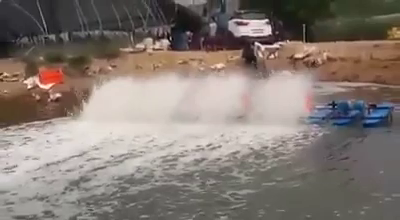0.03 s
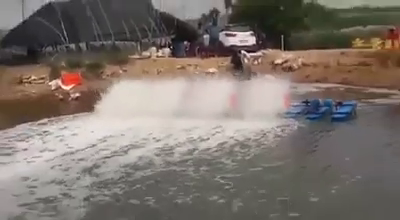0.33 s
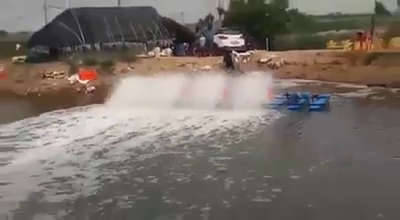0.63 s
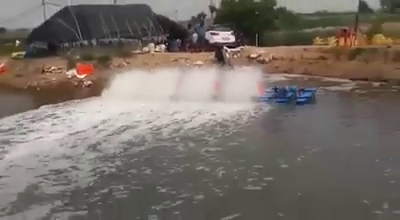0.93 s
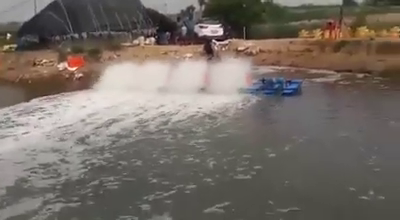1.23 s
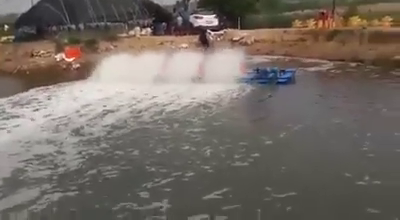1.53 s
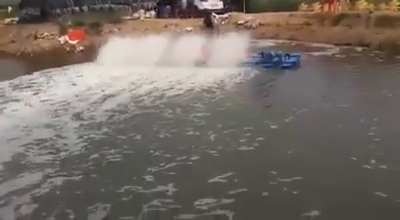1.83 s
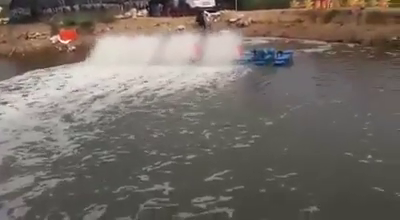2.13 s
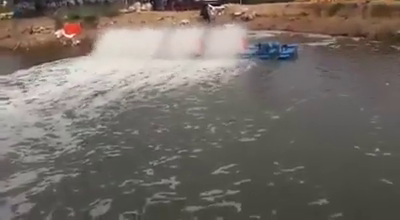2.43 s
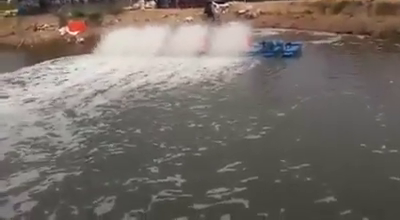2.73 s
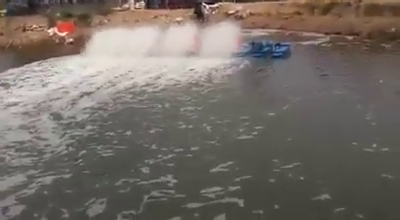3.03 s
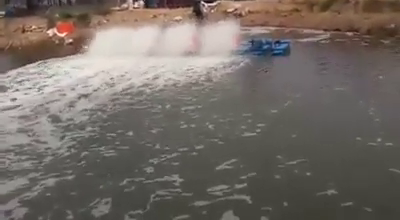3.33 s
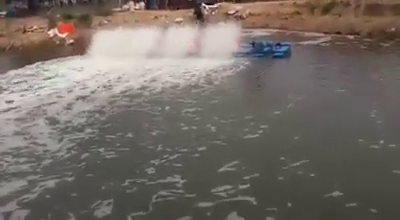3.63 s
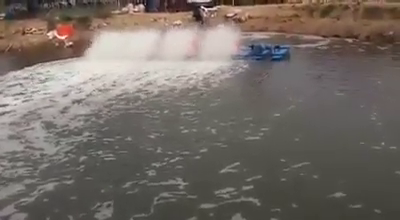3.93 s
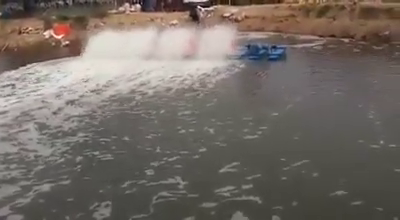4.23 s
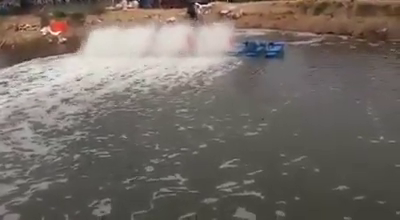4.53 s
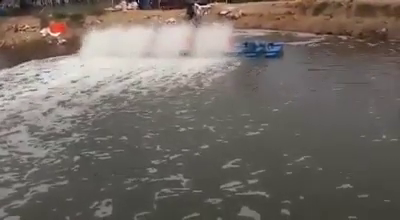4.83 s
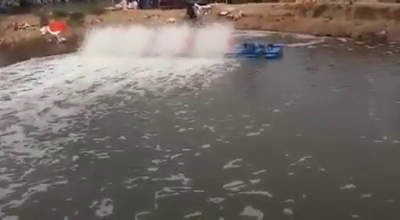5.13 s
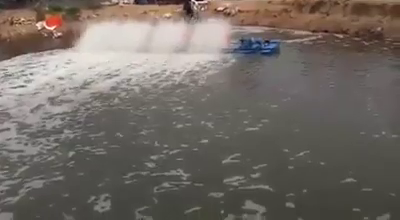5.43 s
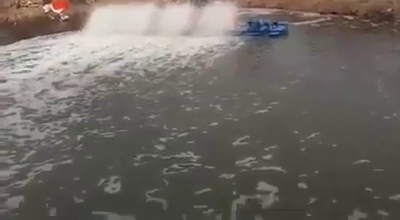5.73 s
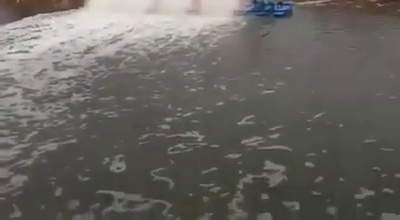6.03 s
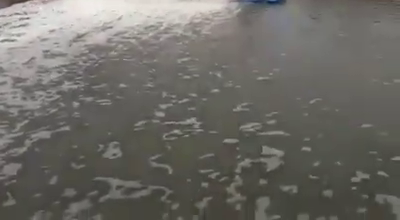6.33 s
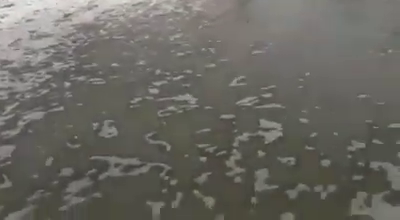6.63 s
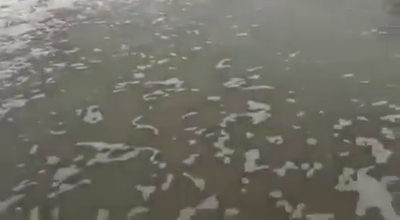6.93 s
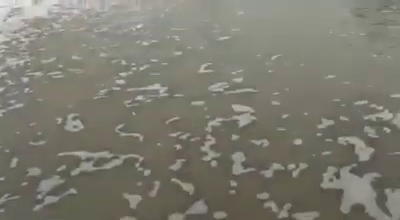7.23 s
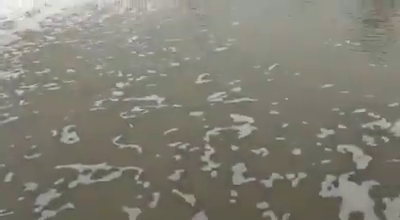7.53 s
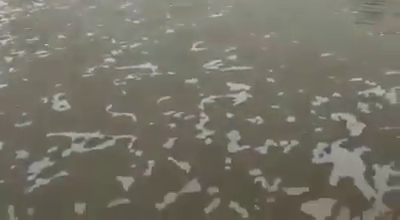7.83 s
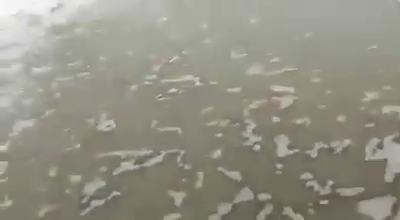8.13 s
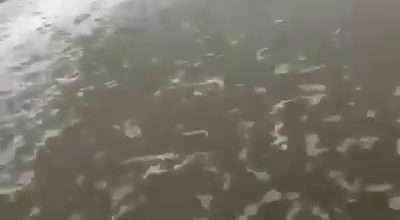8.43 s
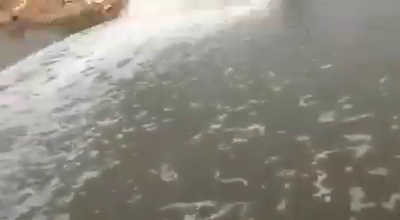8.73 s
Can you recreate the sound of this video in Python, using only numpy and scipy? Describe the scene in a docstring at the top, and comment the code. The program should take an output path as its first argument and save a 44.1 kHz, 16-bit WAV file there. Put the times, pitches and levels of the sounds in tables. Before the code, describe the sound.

Wind rumbles and thumps on the microphone over the continuous bright rush of a paddlewheel throwing spray across a pond.

```python
"""A paddlewheel aerator throws a curtain of spray across a pond, heard from the windy bank.
Countless drops merge into a bright rush whose colour shifts as the microphone turns and tips down.
Wind eddies buffet the microphone, push its limiter down and die away near the end.
A small bird whistles once, thin and falling."""
import sys
import numpy as np
from scipy import signal
from scipy.fft import rfft, irfft, next_fast_len
from scipy.io import wavfile
from scipy.ndimage import uniform_filter1d

SR = 44100
rng = np.random.default_rng(int(sys.argv[2]) if len(sys.argv) > 2 else 0)


def transcribe(u):
    """Save the signal u as a 16-bit wav file named by the first command-line argument.

    u: samples, shape (n,) or (channels, n), limited to [-1, 1]; the rate is SR.
    q: integer samples, one column per channel.
    """
    v = np.clip(np.atleast_2d(u).T, -1, 1)
    q = np.round(v * 32767).astype(np.int16)
    wavfile.write(sys.argv[1], SR, q)


N = 396459
TIME = np.arange(N) / SR
# microphone aim: (time [s], turned to the wheel [0-1], tipped down at the water [0-1])
AIM = [(0, 0.07, 0), (1.55, 0.06, 0), (1.72, 0.25, 0.2), (2.1, 0.8, 0.08), (3.3, 1, 0), (5.6, 0.96, 0.15),
       (6.6, 0.91, 0.2), (7.6, 0.66, 0.44), (8.4, 0.37, 0.72), (8.99, 1, 0.7)]


def spray(surge_db=0.67, trim_db=-1.23):
    """The wheel runs steadily; its rush changes colour with the aim and grows once the mic faces it."""
    # spray at the mic: (time [s], relative level [dB])
    loudness = [(0, -38), (1.8, -38), (2.3, -36), (5.5, -35), (7.3, -36), (8.99, -36)]
    # rush spectrum at each aim: (frequency [Hz], relative density [dB])
    aside_spectrum = [(150, 3.5), (950, 1.5), (1300, -2), (2000, -2), (2800, -10.5), (3700, -2.5),
                      (4500, -10), (5300, -7), (6600, -7), (8000, -19), (11000, -26.5), (13000, -34),
                      (13800, -19), (15700, -22)]
    facing_spectrum = [(150, -5), (950, 4), (1350, -4), (1900, 2.5), (2650, -2.5), (3400, -14.5),
                       (4600, 1.5), (5500, 2), (6200, -4), (8200, -11.5), (9300, -19.5), (11800, -15),
                       (13000, -24), (15000, -12)]
    down_spectrum = [(100, -8), (300, 8), (440, 11), (580, -2), (950, 10.5), (1350, -1), (2200, 3.5),
                     (3100, -2), (4600, 0), (5900, -4.5), (6600, 0), (8700, -2.5), (9900, -11),
                     (15700, -16)]
    water = drops()
    aside, facing, down = (coloured(water, spectrum, band_hz=(4000, 12000))
                           for spectrum in (aside_spectrum, facing_spectrum, down_spectrum))
    turned, tipped = np.clip(follow(AIM), 0, 1)
    upright = (1 - turned) * aside + turned * facing
    rush = (1 - tipped) * upright + tipped * down + hollow_ring()
    (level_db,) = follow(loudness)
    return rush * gain_of(level_db + trim_db + surge_db * wander(rate_hz=32))


def drops(drop_share=0.24, patchy_db=1.25):
    """Drops patter over a wash of finer spray; each sheet of water lands with its own colour."""
    wash = np.sqrt(1 - drop_share) * rng.standard_normal(N)
    patter = np.sqrt(drop_share) * impacts(per_s=3200, spread_db=1.0)
    spectra = signal.stft(wash + patter, nperseg=512, noverlap=384)[2]
    patches = uniform_filter1d(rng.standard_normal(spectra.shape[::-1]), size=22, axis=0)  # over time
    patches = unit_rms(uniform_filter1d(patches, size=4, axis=1))  # over frequency
    return signal.istft(spectra * gain_of(patchy_db * patches.T), nperseg=512, noverlap=384)[1][:N]


def hollow_ring(width_hz=670, trim_db=-4.0):
    """A hollow band in the hiss that sinks as the mic tips down."""
    # resonance: (time [s], centre [Hz], relative level [dB])
    resonance = [(1.8, 5450, -28), (2.3, 5470, 3), (3, 5160, -15.5), (5.8, 5060, -3), (7, 4900, -5),
                 (7.7, 4720, 0), (8.3, 4730, -0.5), (8.99, 4570, -6)]
    hz, level_db = follow(resonance)
    ring = resonate(resonate(rng.standard_normal(N), hz, width_hz), hz, width_hz)
    return gain_of(level_db + trim_db) * unit_rms(ring)


def reflected(x, base_gain=0.075, tipped_gain=0.078, dull_hz=4500):
    """A soft surface close behind the mic combs the sound; the comb deepens and slides as it tips down."""
    # near reflection, likely off whoever holds the mic: (time [s], delay [s])
    echo_path = [(0, .00116), (4, .00115), (6, .00112), (7.5, .00104), (8.99, .00102)]
    (delay_s,) = follow(echo_path)
    pole = np.exp(-2 * np.pi * dull_hz / SR)
    echo = np.interp(TIME - delay_s, TIME, signal.lfilter([1 - pole], [1, -pole], x))
    _, tipped = np.clip(follow(AIM), 0, 1)
    return x + (base_gain + tipped_gain * tipped) * echo


def wind(rumble_db=-1.5, flutter_db=-3.0, lumpy_db=4.0, ragged_db=5.5,
         lull_db=-36, lull_hz=125, puffy=0.13, even_above_db=-13):
    """Large eddies rumble on the mic; small ones hit it in ragged clusters within each gust."""
    # large and small eddy spectra: (frequency [Hz], relative density [dB])
    rumble_spectrum = [(15, -24), (35, -23), (55, -16.5), (85, -3.5), (130, -1), (200, -1), (300, -6),
                       (450, -13.5), (800, -76), (2000, -79)]
    flutter_spectrum = [(60, -31), (150, -9), (280, 2), (450, 0.5), (700, -7.5), (1000, -18.5), (1500, -28),
                        (3000, -50), (8000, -74)]
    large_db, small_db = airflow()
    # the flow catches and lets go many times within a gust
    swirl = wander(rate_hz=42.4)
    swirl = unit_rms(np.tanh(swirl - uniform_filter1d(swirl, size=4400)))
    # slow air carries large eddies past less often: the rumble deepens
    speed = 1 / (1 + np.exp((lull_db - uniform_filter1d(small_db, size=8000)) / 4))
    brisk = coloured(rng.standard_normal(N), rumble_spectrum, band_hz=(40, 350))
    slow = unit_rms(signal.sosfiltfilt(signal.butter(1, lull_hz, fs=SR, output="sos"), brisk))
    rumble = steadied(speed * brisk + (1 - speed) * slow, window_s=0.038)
    kicks = impacts(per_s=550, spread_db=4.0)
    flutter = steadied(coloured(kicks, flutter_spectrum, band_hz=(380, 900)), window_s=0.085)
    # slow air breaks into puffs; a strong gust holds more evenly
    swirl = swirl * (1 + puffy * (1 - speed)) / (1 + gain_of(small_db - even_above_db))
    return (rumble * gain_of(large_db + rumble_db + lumpy_db * swirl)
            + flutter * gain_of(small_db + flutter_db + ragged_db * swirl))


def airflow(brisk_db=-14, brisk_flutter_db=-22.5, flutter_db_per_db=2.4, gap_db=-7):
    """Large and small eddy levels [dB]; the small ones grow faster with the breeze."""
    # breeze, with a deep early lull and a final calm: (time [s], level [dB])
    breeze = [(0, -16), (.69, -20), (1.32, -15), (1.76, -19), (1.81, -41), (1.91, -31), (1.98, -13.5),
              (2.41, -23), (2.66, -17.5), (3.32, -12), (3.61, -22.5), (3.96, -14.5), (4.3, -22.5),
              (4.48, -18), (5.6, -20), (6.5, -20), (7.22, -24), (8.15, -26), (8.3, -36), (8.99, -41.5)]
    # gusts on top of it: (crest time [s], length [s], rumble [dB], flutter [dB])
    gusts = [(0.395, 0.092, -21, -18.5), (0.591, 0.073, -26, -20.5), (0.86, 0.26, -22, -23),
             (1.589, 0.076, -22.5, -20), (2.047, 0.06, -8.5, -9.5), (2.742, 0.16, -12.5, -22),
             (2.943, 0.16, -15, -31), (3.182, 0.042, -6.5, -34), (3.52, 0.08, -15.5, -27.5),
             (3.713, 0.04, -8, -29), (3.824, .17, -13.5, -14.5), (4.102, 0.042, -13, -27),
             (4.379, 0.057, -12, -18), (4.592, 0.039, -33, -19), (4.907, .17, -11.5, -14.5),
             (5.164, 0.095, -16, -27.5), (5.308, 0.095, -9.5, -26.5), (5.677, 0.35, -15, -22),
             (6.224, 0.1, -13.5, -30), (6.416, 0.11, -20, -25.5), (6.533, 0.033, -11.5, -27.5),
             (6.87, 0.1, -17.5, -27.5), (6.981, 0.062, -12.5, -38), (7.065, 0.044, -17, -32.5),
             (7.289, 0.028, -12, -39), (7.544, 0.073, -19.5, -38), (7.65, .06, -16, -46),
             (7.964, .14, -18.5, -52), (8.12, 0.16, -23.5, -59), (8.582, .06, -23, -54),
             (8.697, 0.032, -17, -54)]
    # the flow lets go of the mic: (time [s], length [s])
    gaps = [(0.2, 0.064), (2.997, 0.026), (3.416, 0.035), (5.409, 0.018), (5.868, 0.045), (6.594, 0.063),
            (6.788, 0.034), (7.243, 0.09), (7.354, 0.069)]
    (breeze_db,) = follow(breeze)
    large_power = gain_of(breeze_db) ** 2
    small_power = gain_of(brisk_flutter_db + flutter_db_per_db * (breeze_db - brisk_db)) ** 2
    for crest_s, length_s, rumble_db, flutter_db in gusts:
        swell = bell(crest_s, length_s)
        large_power += (gain_of(rumble_db) * swell) ** 2
        small_power += (gain_of(flutter_db) * swell) ** 2
    dip_db = gap_db * sum(bell(at_s, length_s) for at_s, length_s in gaps)
    return 10 * np.log10(large_power) + dip_db, 10 * np.log10(small_power) + dip_db


def buffets(trim_db=1.8, quickness=0.92, delay_s=0.00287):
    """One eddy crossing the mic is a single cusped pressure swing, quicker when it is small."""
    # hard single eddies: (time [s], relative peak [dB], size as nominal frequency [Hz])
    eddies = [(0.41, -2.5, 443), (0.921, -9, 454), (1.145, -11, 291), (1.249, -8.5, 296), (1.436, -8, 257),
              (2.026, -8, 218), (2.049, -7, 533), (2.681, -0.5, 199), (2.723, -5, 235), (2.78, 3, 256),
              (2.965, 1.5, 253), (3.27, -7, 266), (3.471, -2, 270), (3.762, -3.5, 371), (3.803, -6, 440),
              (3.877, -4, 458), (3.945, -0.5, 254), (4.087, -3.5, 320), (4.361, -15, 292),
              (4.833, -5.5, 202), (4.984, -13, 280), (5.134, -11, 336), (5.35, 1.5, 320), (5.598, -8, 229),
              (5.628, -5.5, 397), (6.436, -9, 345), (6.97, -6, 264), (7.285, -13, 226)]
    out = np.zeros(N)
    t = np.arange(-SR // 40, SR // 40) / SR
    for (at_s, peak_db, hz), phase in zip(eddies, rng.random(len(eddies))):
        swing = np.exp(2j * np.pi * phase) / (1 - 1j * np.pi * quickness * hz * t) ** 3
        add(out, at_s + delay_s + t[0], gain_of(peak_db + trim_db) * swing.real)
    return out


def bird(waver=0.0064):
    """A thin, slightly unsteady whistle that falls and fades."""
    # whistle contour: (time [s], pitch [Hz], level [dB])
    whistle = [(6.6, 7060, -45), (6.74, 6560, -44), (6.775, 6490, -37), (6.805, 6400, -33),
               (6.83, 6410, -55), (6.925, 6500, -39), (6.97, 6330, -58)]
    hz, level_db = follow(whistle)
    cycles = np.cumsum(hz * (1 + waver * wander(rate_hz=157))) / SR
    sounding = (TIME > whistle[0][0]) & (TIME < whistle[-1][0])
    return sounding * gain_of(level_db) * np.sin(2 * np.pi * cycles)


def gain_of(db):
    """Decibels to amplitude."""
    return 10 ** (np.asarray(db) / 20)


def unit_rms(x):
    """Scales to rms 1."""
    return x / np.sqrt(np.mean(x ** 2) + 1e-20)


def follow(rows):
    """A timed table's value columns, interpolated per sample."""
    times_s, *columns = np.transpose(rows)
    return [np.interp(TIME, times_s, column) for column in columns]


def bell(centre_s, length_s):
    """A smooth swell to 1 and back."""
    return np.exp(-np.minimum((2 * (TIME - centre_s) / length_s) ** 2, 20))


def wander(rate_hz, size=16384):
    """Smooth random drift of rms 1, rolled off above the rate."""
    hz = np.fft.rfftfreq(size, TIME[-1] / size)
    drift = irfft(rfft(rng.standard_normal(size)) * np.exp(-(hz / rate_hz) ** 2), size)
    return np.interp(TIME, np.linspace(0, TIME[-1], size), unit_rms(drift))


def impacts(per_s, spread_db):
    """Randomly timed kicks of either sign, mostly small, a few large."""
    size = gain_of(spread_db * np.minimum(rng.exponential(1, N), 4))
    return unit_rms(size * rng.choice([-1, 1], N) * (rng.random(N) < per_s / SR))


def coloured(x, spectrum, band_hz):
    """Filters x by a spectrum, scaled to rms 1 inside the band."""
    size = next_fast_len(N, real=True)
    hz = np.fft.rfftfreq(size, 1 / SR)
    knots_hz, knots_db = np.transpose(spectrum)
    shaped = rfft(x, size) * gain_of(np.interp(np.log(hz + 1), np.log(knots_hz), knots_db))
    inside = shaped[(hz > band_hz[0]) & (hz < band_hz[1])]
    return irfft(shaped, size)[:N] * N / np.sqrt(2 * np.sum(abs(inside) ** 2))


def resonate(x, hz, width_hz):
    """Moving resonance of gain 1: shifts hz to zero, smooths, shifts back."""
    carrier = np.exp(2j * np.pi * np.cumsum(hz) / SR)
    pole = np.exp(-np.pi * width_hz / SR)
    return 2 * (carrier * signal.lfilter([1 - pole], [1, -pole], x / carrier)).real


def steadied(x, window_s):
    """Flattens swells slower than the window."""
    size = max(int(window_s * SR), 2)
    power = uniform_filter1d(uniform_filter1d(x ** 2, size), size)
    return x * np.sqrt(np.mean(x ** 2) / (abs(power) + 1e-9))


def add(mix, at_s, sound):
    """Mixes a sound in at a time."""
    part = mix[max(round(at_s * SR), 0):][:len(sound)]
    part += sound[:len(part)]


def scene():
    """Spray, wind and bird at one microphone."""
    return (reflected(spray() + bird()) + wind() + buffets())[None]


def record(dry, ceiling_db=-13.0, recover_db_per_s=70, edge_hz=15750):
    """A limiter clamps wind bursts and recovers slowly, ducking the spray; then a low-pass."""
    power = abs(uniform_filter1d(dry[0] ** 2, size=300))
    over_db = np.maximum(10 * np.log10(power + 1e-12) - ceiling_db, 0)
    recovery_db = recover_db_per_s * TIME
    cut_db = np.maximum.accumulate(over_db + recovery_db) - recovery_db
    gain = uniform_filter1d(gain_of(-cut_db), size=200)
    low_pass = signal.firwin(511, edge_hz, window=("kaiser", 9), fs=SR)
    return signal.oaconvolve(dry * gain, low_pass[None], "same")


dry = scene()
out = record(dry)
transcribe(out)
```